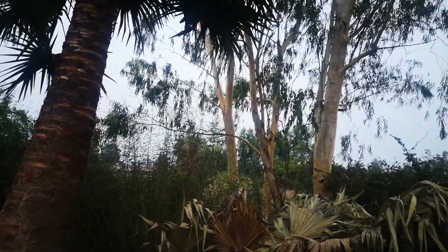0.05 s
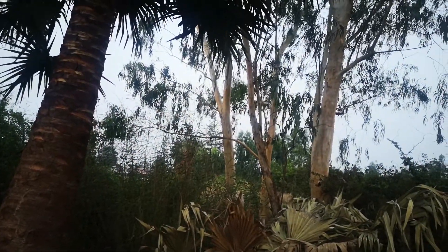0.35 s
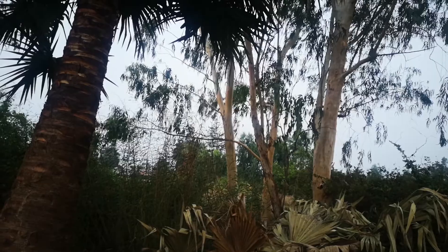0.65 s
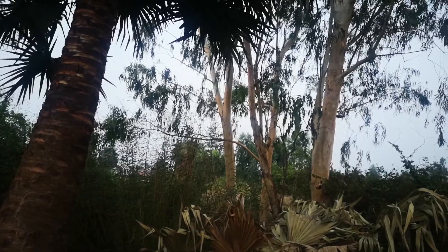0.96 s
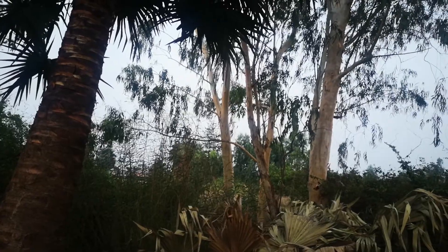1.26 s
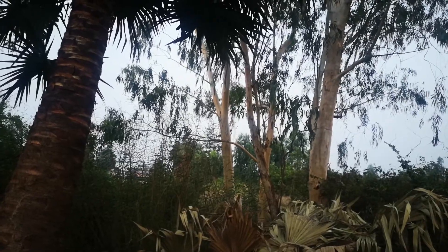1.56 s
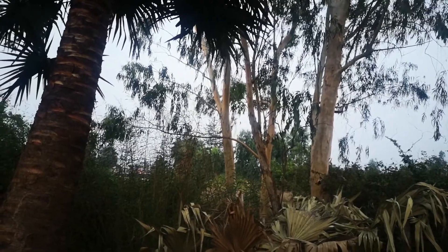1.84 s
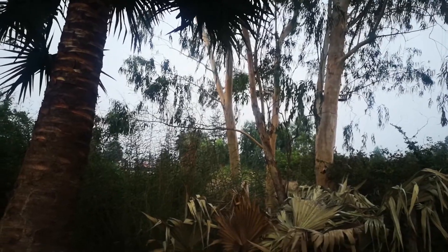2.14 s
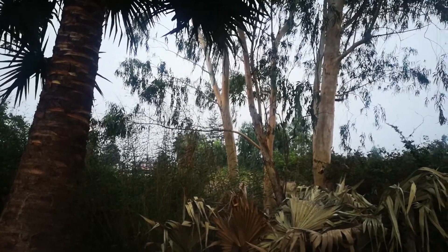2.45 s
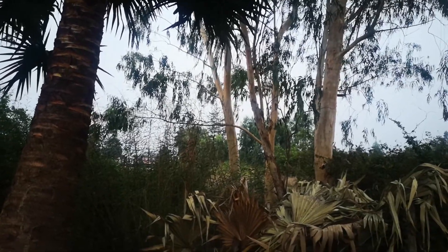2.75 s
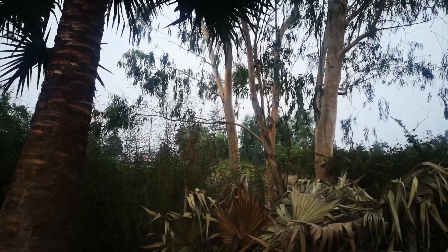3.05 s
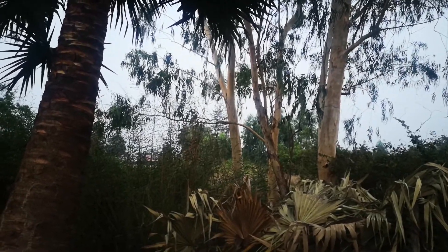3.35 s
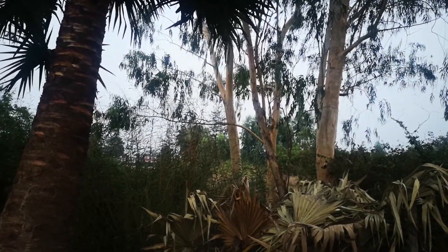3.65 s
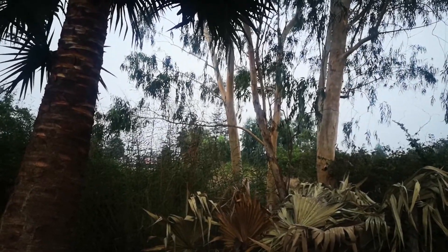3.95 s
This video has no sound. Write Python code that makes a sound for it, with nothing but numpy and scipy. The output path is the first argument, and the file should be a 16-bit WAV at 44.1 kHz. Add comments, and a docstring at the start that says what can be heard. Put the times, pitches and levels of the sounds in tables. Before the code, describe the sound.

A bird gives one loud whistle that dips, rises and falls away, echoing briefly among trees. Small birds then chip farther off over faint insects, while air rumbles and bumps dully on the microphone.

```python
"""A whistle in a garden

A bird gives one loud whistle: it sags, swells to a bright crest and falls away, and the trees echo it.
Small birds chip, scold and call farther off, and insects pulse in the foliage. Underneath lie a soft
wash of leaves, a distant engine drone and the rumble and dull bumps of air on the microphone."""
import sys
import numpy as np
from scipy import signal
from scipy.fft import rfft, irfft
from scipy.io import wavfile
from scipy.ndimage import uniform_filter1d

SR = 44100
rng = np.random.default_rng(int(sys.argv[2]) if len(sys.argv) > 2 else 0)


def dump(signal):
    """Clip the signal to [-1, 1] and save it as 16-bit WAV at the path in sys.argv[1]."""
    limited = np.clip(np.atleast_2d(signal).T, -1, 1)
    pcm = np.round(limited * 32767).astype(np.int16)
    wavfile.write(sys.argv[1], SR, pcm)


N = 176400
FAR_T60_S = .45  # reverberation time of the distant birds
# envelope of the open air and the crowd of birds (time [s], relative level [dB])
AMBIENT_LEVEL = [(0.0, -63.5), (0.28, -62.5), (0.97, -58), (1.12, -60.5), (1.88, -59.5), (3.8, -59.5),
                 (4.0, -61)]


def undb(db):
    """Amplitude ratio of a level in decibels."""
    return 10 ** (np.asarray(db) / 20)


def curve(rows, column=1):
    """Linear interpolation of one table column in time."""
    rows = np.array(rows)
    return np.interp(np.arange(N) / SR, rows[:, 0], rows[:, column])


def colour(points, hz):
    """Interpolation of (frequency [Hz], value) on a logarithmic frequency axis."""
    points = np.array(points)
    return np.interp(np.log(hz + 1), np.log(points[:, 0] + 1), points[:, 1])


def noise(gain):
    """Spectral shaping: white noise filtered by gain(frequency), at unit rms."""
    x = irfft(rfft(rng.standard_normal(N)) * gain(np.fft.rfftfreq(N, 1 / SR)), N)
    return x / x.std()


def band(hz, width_hz):
    """Band-pass noise with a Gaussian spectrum."""
    return noise(lambda f: np.exp(-((f - hz) / width_hz) ** 2 * 2))


def walk(rate_hz):
    """Random modulation: low-pass noise of zero mean and unit rms."""
    return noise(lambda f: (f > 0) * np.exp(-(f / rate_hz) ** 2))


def wide(spectrum, correlation):
    """Partially coherent stereo noise: the balance of mid and side sets the left-right correlation."""
    f = np.fft.rfftfreq(N, 1 / SR)
    c = np.clip(colour(correlation, f), -1, 1)
    mid, side = rfft(rng.standard_normal((2, N))) * undb(colour(spectrum, f)) * np.sqrt([1 + c, 1 - c])
    x = irfft(np.array([mid + side, mid - side]), N)
    return x / x.std()


def trees(x, t60, build_s=.016):
    """Multiple scattering by trunks and leaves: an exponentially decaying echo, different at each ear."""
    t = np.arange(SR) / SR
    onset = 1 - np.exp(-(t / build_s) ** 2)
    echo = rng.standard_normal((2, SR)) * onset * np.exp(-np.log(1000) * t / t60)
    echo /= np.sqrt((echo ** 2).sum(axis=1, keepdims=True))
    return signal.fftconvolve(x[None], echo, axes=1)[:, :N]


def note(start, length, start_hz, end_hz, waver):
    """A linear frequency glide under a half-sine envelope."""
    progress = np.clip((np.arange(N) / SR - start) / length, 0, 1)
    hz = (start_hz + (end_hz - start_hz) * progress) * (1 + waver)
    return np.sqrt(2) * np.sin(np.pi * progress) * np.sin(2 * np.pi * np.cumsum(hz) / SR)


def air():
    """Incoherent sources, leaves and distant life, add up to broadband noise; a low-mid wash grows."""
    # noise spectrum (frequency [Hz], relative density [dB])
    spectrum = [(160, -11.5), (280, -9), (342, 0), (441, -9), (670, -6), (938, -6), (1050, -5), (1360, -8),
                (2060, -5.5), (2570, -10), (3090, -17.5), (3650, -19), (4250, -21.5), (4860, -18),
                (6250, -23.5), (7650, -21), (8600, -21), (10700, -30), (15500, -35.5)]
    # likeness of the two ears (frequency [Hz], correlation [-1..1])
    correlation = [(300, -0.52), (1000, -0.68), (2000, 0.092), (15000, -0.19)]
    # envelope of the wash (time [s], level [dB])
    wash_level = [(0, -71.5), (2, -69.5), (3, -64.5), (4, -62)]
    bed = wide([(100, -44.0)] + list(spectrum), correlation)
    wash = undb(curve(wash_level)) * np.array([band(hz=730, width_hz=920) for _ in range(2)])
    flicker_db = 1.02 * walk(9.7)
    return bed * undb(curve(AMBIENT_LEVEL) + 3 + flicker_db) + wash


def rumble():
    """Pressure fluctuations buffet the microphone; a rough flutter grows as a power of their strength."""
    # buffeting spectrum (frequency [Hz], relative density [dB])
    spectrum = [(8, -24), (18, -1.5), (35, -1.5), (60, 1.5), (85, -8), (115, -10.5), (150, -22),
                (200, -30.5), (280, -34), (400, -43), (700, -82)]
    # gust envelope (time [s], relative level [dB])
    gust_level = [(0.0, -40.5), (1.07, -34.5), (1.12, -31), (1.15, -42), (1.25, -31.5), (1.85, -29),
                  (1.86, -32), (2.13, -32), (2.21, -37.5), (3.0, -31), (3.15, -36.5), (3.21, -27.5),
                  (3.31, -32), (4.0, -33.5)]
    # likeness of the two ears (frequency [Hz], correlation [-1..1])
    correlation = [(25, 0.99), (70, 0.97), (130, 0.9), (220, 0.99), (330, .1)]
    gust = undb(curve(gust_level))
    flutter = band(hz=137, width_hz=107) * undb(-48) * (gust / gust.max()) ** 2.66
    return wide(spectrum, correlation) * gust * undb(-.5) + flutter


def engine_drone():
    """Common frequency modulation: the partials of a distant engine waver together with its speed."""
    # engine tones (frequency [Hz], starting level [dB], final level [dB])
    partials = [(74.93, -46.5, -43), (59.98, -51, -40), (323.8, -83.5, -68), (356.6, -82.5, -71)]
    speed = 1 + .01528 * walk(4.7)
    drone = 0
    for hz, first_db, last_db in partials:
        amplitude = np.sqrt(2) * undb(np.linspace(first_db, last_db, N) + 1.5 * walk(6))
        drone += amplitude * np.sin(2 * np.pi * np.cumsum(hz * speed) / SR)
    return drone


def insects(pulse_s=.029, width_hz=600, pan_db=3):
    """Amplitude-modulated narrowband noise: insects rasp in soft pulses over a flickering chorus."""
    # rasping pulses (time [s], level before panning [dB], centre frequency [Hz])
    pulses = [(.08, -70, 8770), (.19, -67, 8900), (.32, -66.5, 8750), (.425, -69, 8800), (1.3, -74, 7950),
              (1.35, -69.5, 8020), (2.55, -74, 8600), (2.67, -69.5, 8300), (2.8, -71, 8530),
              (2.89, -74, 8360), (3.0, -71, 8500), (3.11, -70.5, 8600), (3.23, -71, 8650),
              (3.33, -76, 8450), (3.43, -75, 8650), (3.55, -74, 8580), (3.65, -69, 8560), (3.77, -71, 8660),
              (3.89, -70, 8760), (3.99, -72, 8940)]
    # chorus bands (centre frequency [Hz], width [Hz], level before panning [dB])
    chorus = [(5000, 44, -84.5), (6200, 22, -99), (7850, 880, -81.5)]
    t = np.arange(N) / SR
    envelope = sum(undb(db) * np.exp(-((t - when) / pulse_s) ** 2 / 2) for when, db, _ in pulses)
    carrier = np.exp(2j * np.pi * np.cumsum(curve(pulses, column=2)) / SR)
    sound = envelope * np.array([(carrier * (walk(width_hz) + 1j * walk(width_hz))).real
                                 for _ in range(2)])
    for hz, width, db in chorus:
        sound += undb(db + 4.5 * walk(8.9)) * np.array([band(hz, width) for _ in range(2)])
    return sound * undb(np.array([[pan_db], [-pan_db]]) / 2)


def bird_crowd(count=44, low_hz=1552, high_hz=2577, note_s=.061):
    """A diffuse field: many distant birds call at random, and only their echoes arrive."""
    calls = np.zeros(N)
    for k, (when, pitch, glide, strength) in enumerate(rng.random((count, 4))):
        start = (k + when) / count * N / SR
        hz = low_hz + pitch * (high_hz - low_hz)
        end_hz = hz * (1 + .0787 * (2 * glide - 1))
        calls += undb(-10 + 3.5 * (2 * strength - 1.5)) * note(start, note_s, hz, end_hz, waver=0)
    return trees(2 * calls * undb(curve(AMBIENT_LEVEL)), t60=FAR_T60_S)


def far_birds():
    """Fast frequency modulation roughens far notes, whose echo is nearly as strong as the direct sound."""
    # (time [s], length [s], start pitch [Hz], end pitch [Hz], level [dB], pitch roughness [fraction])
    notes = [(0.411, 0.064, 2500, 2660, -60, .04), (1.421, 0.046, 1692, 1720, -58, 0.029),
             (1.457, 0.047, 1700, 1618, -56, .025), (2.162, 0.11, 970, 1326, -64, 0.033),
             (2.261, .06, 1331, 1278, -60, .06), (3.213, 0.043, 2050, 2216, -62, 0.072),
             (3.6, 0.035, 2420, 2420, -61, 0.012), (3.634, 0.046, 1780, 1704, -63, 0.0086),
             (3.666, 0.051, 1950, 2102, -57, 0.0153)]
    waver = walk(400)
    calls = sum(undb(db) * note(start, length, start_hz, end_hz, roughness * waver)
                for start, length, start_hz, end_hz, db, roughness in notes)
    return calls + undb(-1) * trees(calls, t60=FAR_T60_S)


def whistle(ear_lag_s=.00002, leaf_cutoff_hz=5500):
    """Source and filter: the harmonics of a nearly pure tone sweep through the throat's resonances."""
    # fundamental (time [s], frequency [Hz])
    pitch = [(.505, 1096), (.525, 1084), (.56, 990), (.61, 987), (.665, 965), (.72, 992), (.77, 1043),
             (.81, 1092), (.85, 1185), (.885, 1242), (.912, 1249), (.938, 1234), (.965, 1163), (1.0, 1034),
             (1.045, 912)]
    # loudness and left-right balance, dipping at each ear as early echoes interfere
    # (time [s], relative level [dB], left minus right [dB])
    level = [(0.5, -81, 5.5), (0.514, -57.5, 5), (0.536, -49, 11), (0.582, -48.5, 9), (0.634, -49, 12),
             (0.68, -48.5, 35), (0.718, -48, 10.0), (0.778, -42, 9), (0.836, -45, 9), (0.85, -50, 19),
             (0.874, -44, -12), (0.894, -42.5, 5), (0.94, -40.5, 2), (0.952, -51.5, 9), (0.974, -43.5, 5.5),
             (1.02, -50, 11), (1.05, -82, 4)]
    # throat response at the crest (frequency [Hz], level against the fundamental [dB])
    throat = [(2000, -24), (2500, -21), (3400, -45), (4300, -40), (4700, -25), (4950, -22.5), (5450, -40),
              (5900, -35), (6250, -30), (7200, -48), (8100, -31), (8750, -22), (9550, -30), (9950, -46),
              (11600, -53), (12400, -37), (13200, -37), (14200, -54)]
    # flare of the harmonics above the second (time [s], gain [dB])
    brightness = [(.5, -28), (.72, -18), (.8, -12), (.87, -4), (.91, 0), (.95, 1), (.985, -7), (1.04, -17)]
    t = np.arange(N) / SR
    hz = uniform_filter1d(curve(pitch), size=800) * (1 + .001 * walk(110))
    phase = 2 * np.pi * np.cumsum(hz) / SR
    sounding = uniform_filter1d(1. * ((t > level[0][0]) & (t < level[-1][0])), size=300)
    shimmer_db = -1.05 * walk(73)
    amplitude = np.sqrt(2) * sounding * undb(curve(level) + 1.5 + shimmer_db)
    tone = amplitude * np.sin(phase)

    fall_hz_per_s = np.maximum(-np.gradient(curve(pitch), t), 0)
    scatter_rad = .3 + .0002 * fall_hz_per_s  # the overtones rasp more while the pitch falls
    overtones = 0
    for k in range(2, 14):
        gain_db = colour(throat, k * hz) + (k > 2) * curve(brightness) + 2.5 * walk(25)
        overtones += amplitude * undb(gain_db) * np.sin(k * phase + scatter_rad * walk(260))

    voice = tone + overtones
    balance_db = uniform_filter1d(curve(level, column=2), size=600)
    ears = undb(np.array([balance_db, -balance_db]) / 2)
    direct = np.array([voice, np.interp(t - ear_lag_s, t, voice)]) * ears / ears.mean(axis=0)
    leaf_absorption = signal.butter(2, leaf_cutoff_hz, fs=SR, output="sos")
    damped = signal.sosfilt(leaf_absorption, overtones)
    return direct + trees(undb(-15) * tone + undb(-1) * damped, t60=.62)


def chips(length_s=.023, spacing_s=.039, rise_db=3.5):
    """Downward frequency sweeps: small birds chip in bursts, each chip louder than the one before."""
    # bursts (time [s], chips [count], relative level [dB], pitch [ratio])
    bursts = [(1.26, 2, -65.5, 0.93), (1.49, 2, -64.5, 0.94), (1.689, 3, -64.5, 0.94),
              (2.419, 3, -55.5, 0.99), (2.614, 3, -57.5, 0.98), (2.816, 2, -58.5, 0.96),
              (3.019, 2, -57, 0.97), (3.09, 2, -57.5, 1), (3.318, 2, -60, 0.99), (3.538, 2, -60, .98)]
    calls, waver = np.zeros(N), .02 * walk(570)
    for start, count, db, ratio in bursts:
        for k in range(count):
            chip = note(start + k * spacing_s, length_s, ratio * 5680, ratio * 4750, waver)
            calls += undb(db - rise_db * (count - .5 - k)) * chip
    return undb(-4) * calls + undb(1.5) * trees(calls, t60=.23)


def bumps(scuff_rise_s=.0078):
    """Bipolar pressure pulses: air pushes and pulls on the microphone, with a scuff unequal at each ear."""
    # pulses (time [s], peak level [dB], spectral peak [Hz], relative scuff level [dB])
    pulses = [(1.36, -20.5, 34, -30), (1.512, -21, 20.7, -45.5), (1.649, -21, 34, -51),
              (1.728, -20, 31, -41.5), (1.776, -22, 125, -31.5), (1.829, -19.5, 33, -44.5),
              (1.926, -26.5, 81, -42), (2.944, -26, 43, -44.5), (3.01, -25, 30, -51),
              (3.235, -27.5, 38, -45.5), (3.538, -27, 83, -40.5), (3.82, -22.5, 36.5, -51)]
    t = np.arange(N) / SR
    pressure, scuff = 0, 0
    for when, db, hz, scuff_db in pulses:
        u = 2 * np.pi * hz * (t - when)
        pressure -= undb(db) * u * np.exp((1 - np.minimum(u ** 2, 100)) / 2)  # derivative of a Gaussian
        age = np.clip((t - when) / scuff_rise_s + .5, 0, 50)
        scuff += undb(scuff_db) * age * np.exp(1 - age)
    mid, side = (band(hz=160, width_hz=145) for _ in range(2))
    return pressure + scuff * (mid + .9 * side * np.array([[1], [-1]]))


def scold():
    """Formant filtering: a bird forces fluttering noise through its throat in a few harsh syllables."""
    # syllables (time [s], length [s], relative level [dB])
    syllables = [(1.402, .016, -63), (1.424, .022, -70), (1.445, .026, -58), (1.462, .042, -60.5)]
    # throat resonances (frequency [Hz], width [Hz], gain [dB])
    formants = [(1980, 400, -8), (2870, 330, -1), (3350, 750, -6)]
    t = np.arange(N) / SR
    effort = sum(undb(db) * np.sin(np.pi * np.clip((t - start) / length, 0, 1))
                 for start, length, db in syllables)
    flutter = undb(2.5 * walk(130))
    call = effort * flutter * sum(undb(db) * band(hz, width) for hz, width, db in formants)
    return call + undb(-1.5) * trees(call, t60=.14)


def scene():
    """Superposition: the pressures of all the garden's sources add at each ear."""
    birds = whistle() + far_birds() + scold() + bird_crowd() + chips()
    return birds + insects() + air() + rumble() + bumps() + engine_drone()


def record(dry, fade_s=.012, cutoff_hz=15650):
    """Band limiting: a steep low-pass filter cuts the top, and the sound eases in and out."""
    t = np.arange(N) / SR
    fade = np.sin(np.pi / 2 * np.clip(np.minimum(t, t[::-1]) / fade_s, 0, 1)) ** 2
    return signal.sosfilt(signal.ellip(10, .1, 80, cutoff_hz, fs=SR, output="sos"), dry * fade)


dry = scene()
out = record(dry)
dump(out)
```